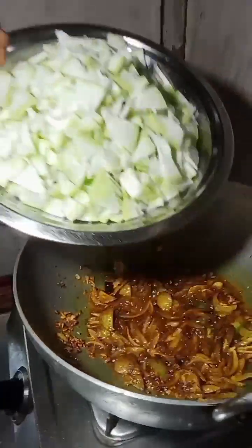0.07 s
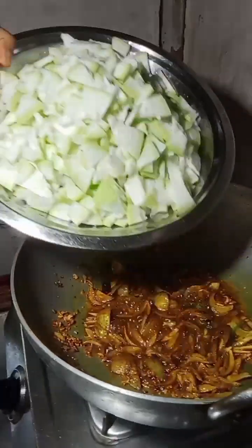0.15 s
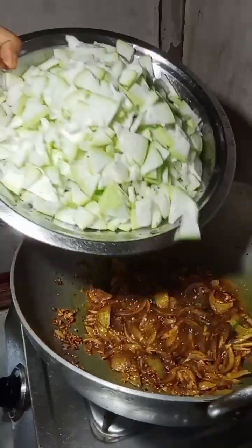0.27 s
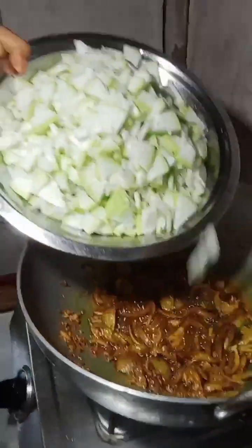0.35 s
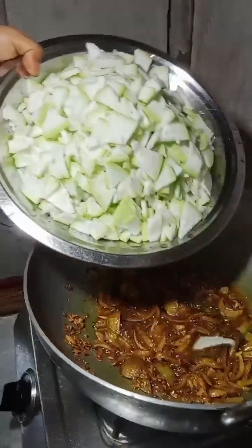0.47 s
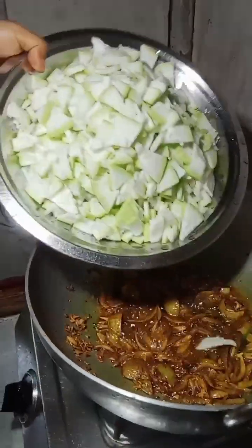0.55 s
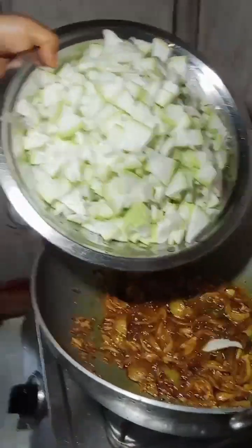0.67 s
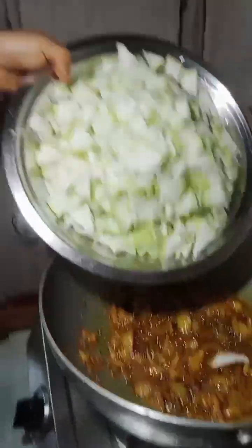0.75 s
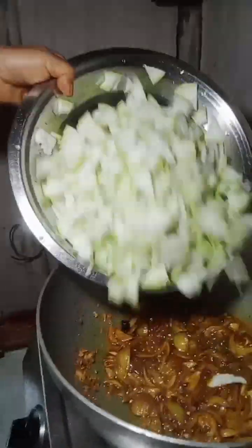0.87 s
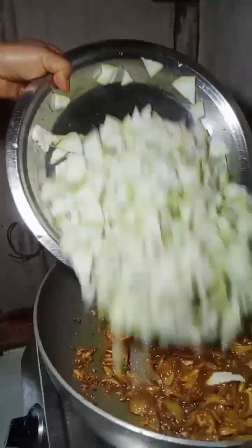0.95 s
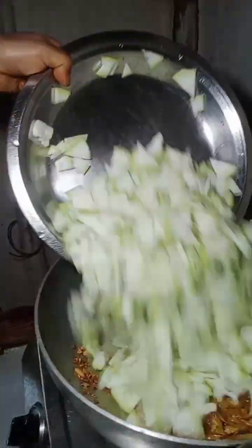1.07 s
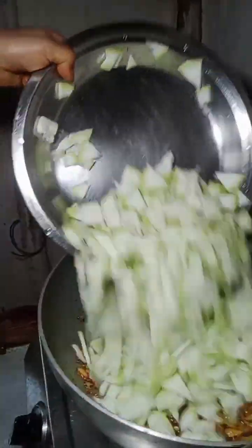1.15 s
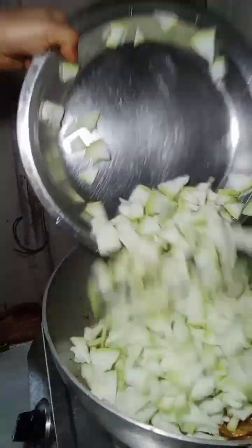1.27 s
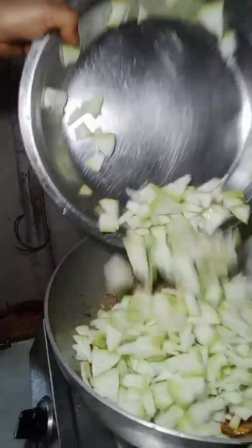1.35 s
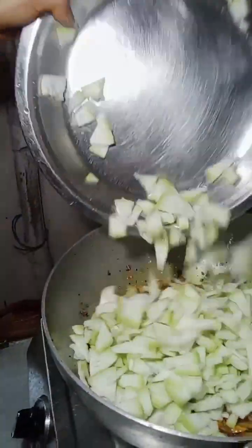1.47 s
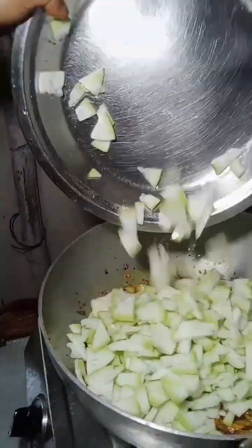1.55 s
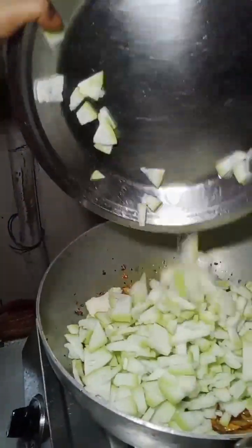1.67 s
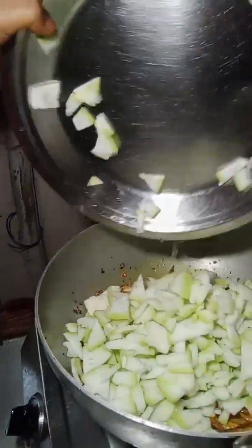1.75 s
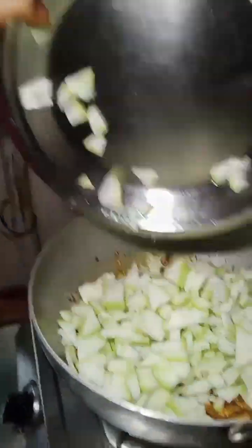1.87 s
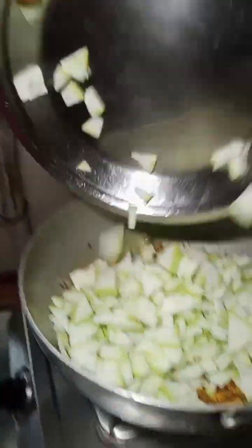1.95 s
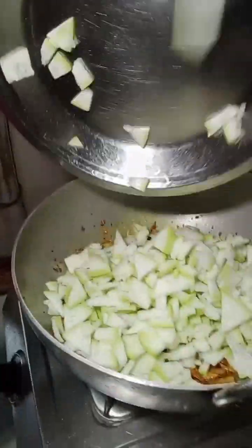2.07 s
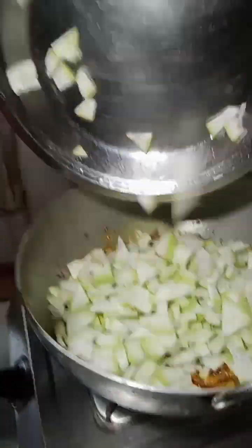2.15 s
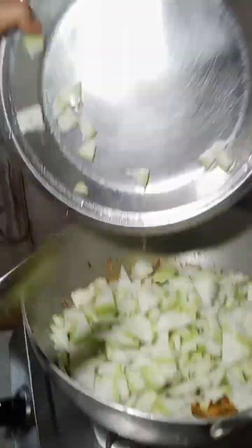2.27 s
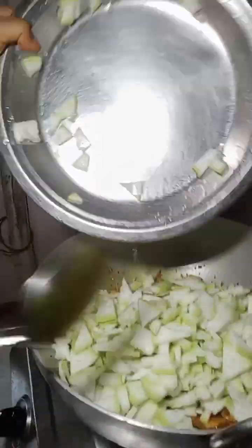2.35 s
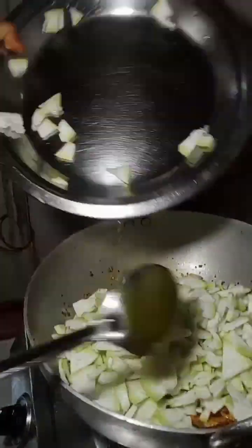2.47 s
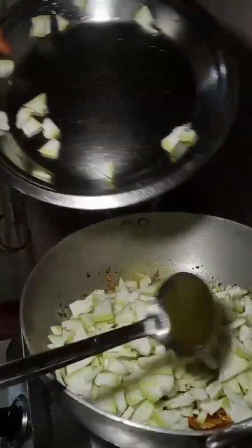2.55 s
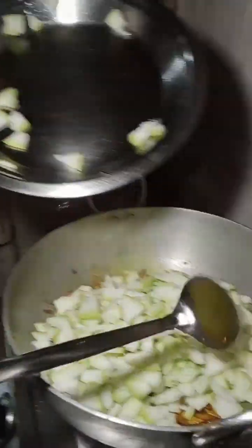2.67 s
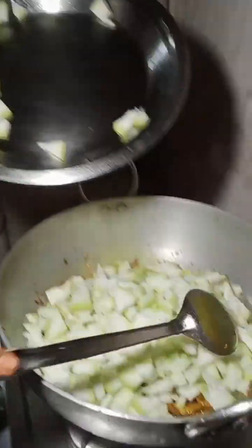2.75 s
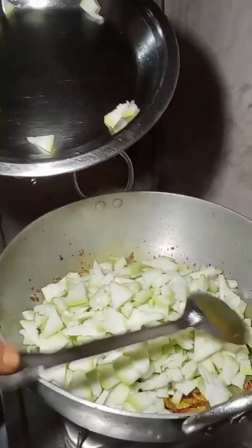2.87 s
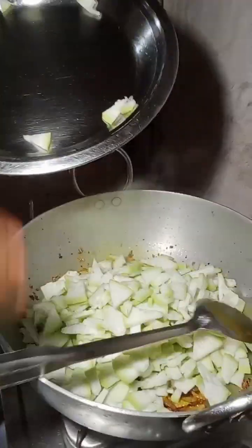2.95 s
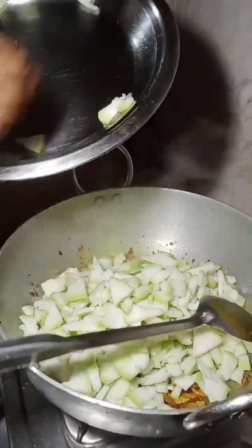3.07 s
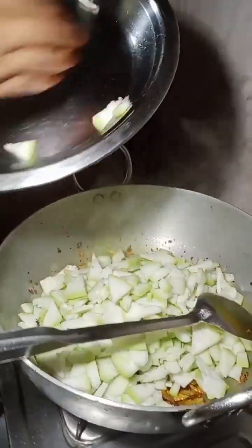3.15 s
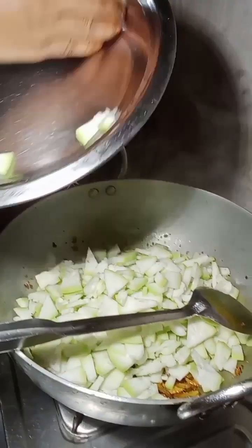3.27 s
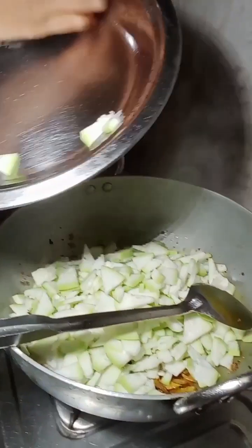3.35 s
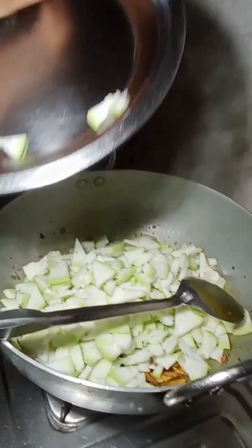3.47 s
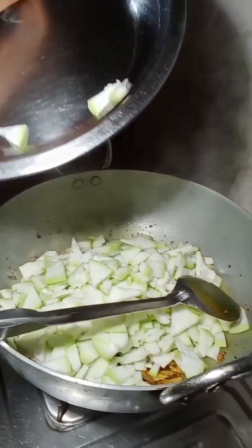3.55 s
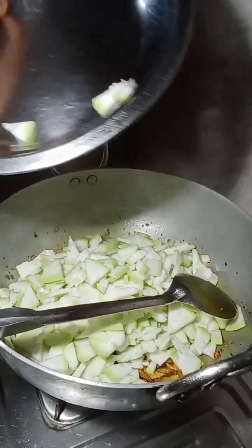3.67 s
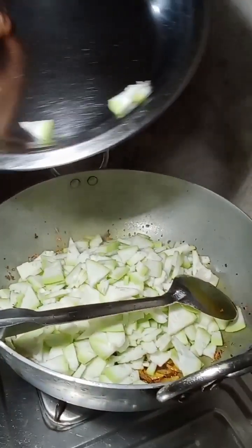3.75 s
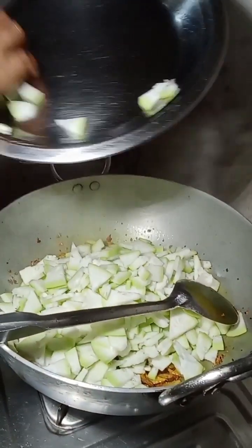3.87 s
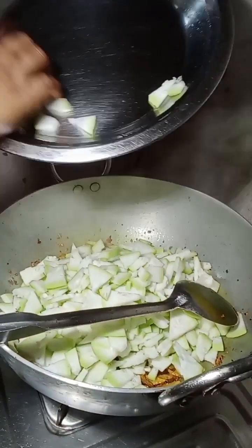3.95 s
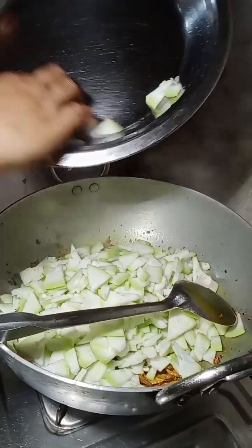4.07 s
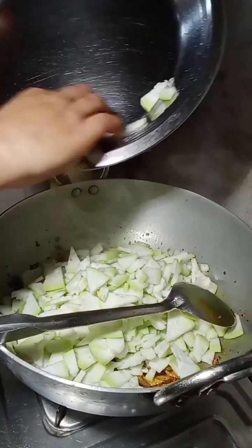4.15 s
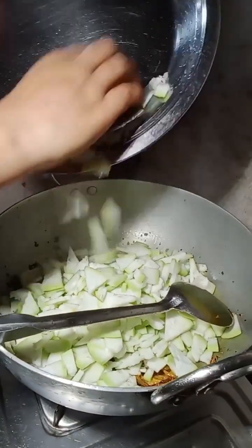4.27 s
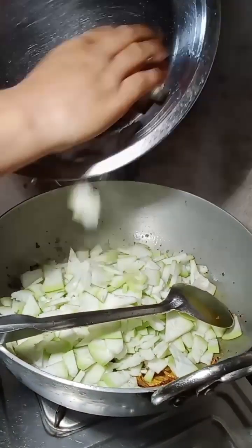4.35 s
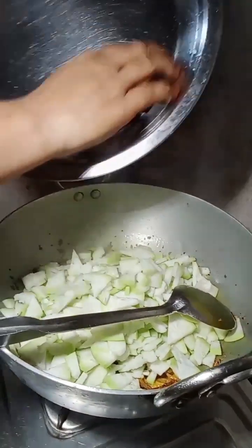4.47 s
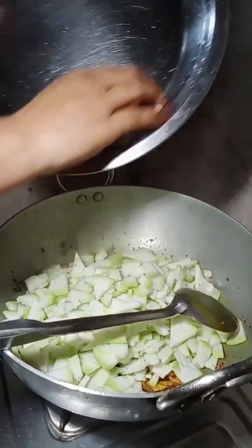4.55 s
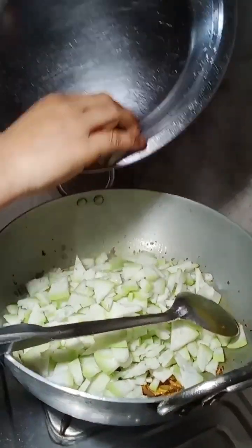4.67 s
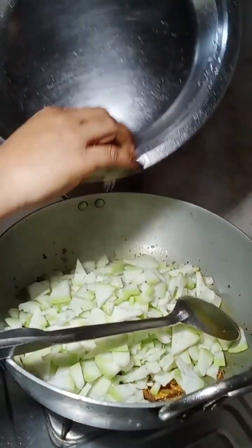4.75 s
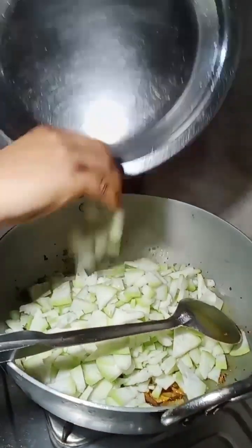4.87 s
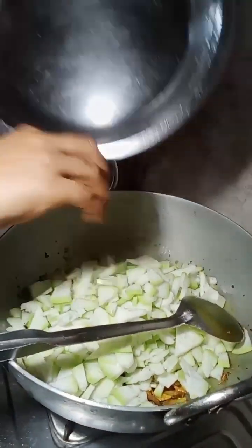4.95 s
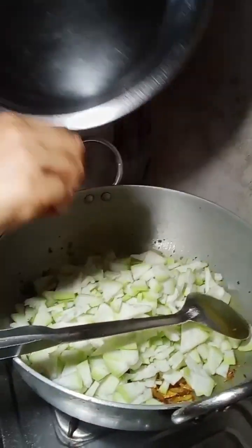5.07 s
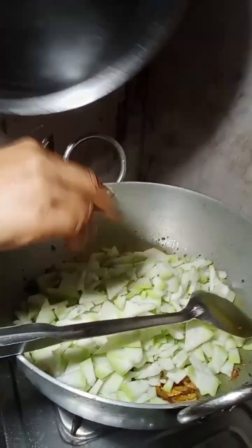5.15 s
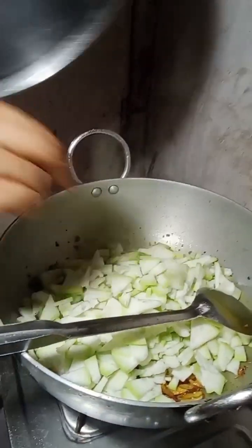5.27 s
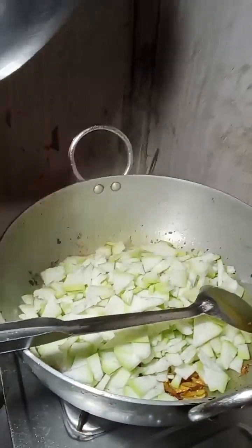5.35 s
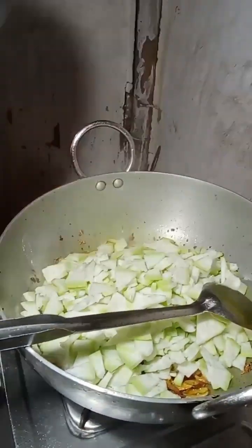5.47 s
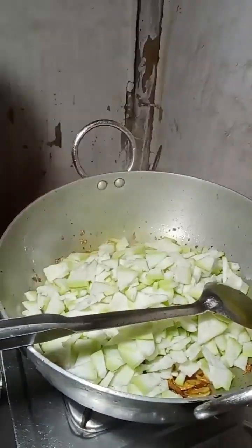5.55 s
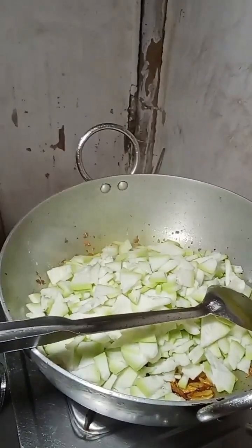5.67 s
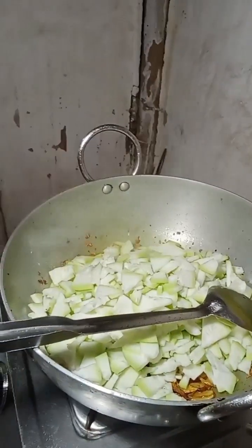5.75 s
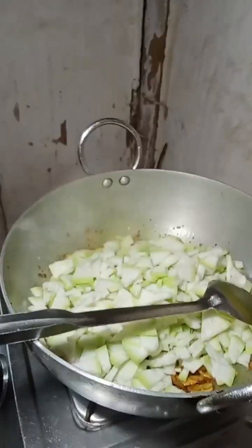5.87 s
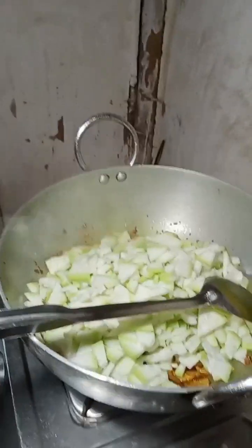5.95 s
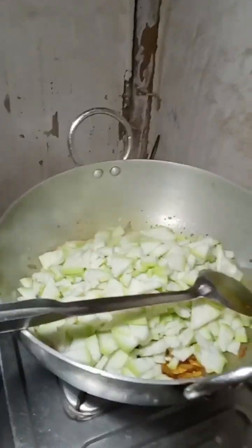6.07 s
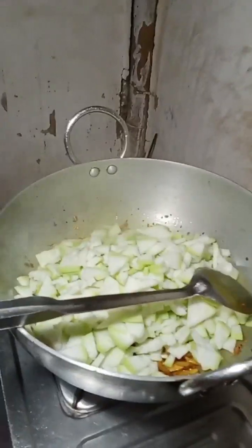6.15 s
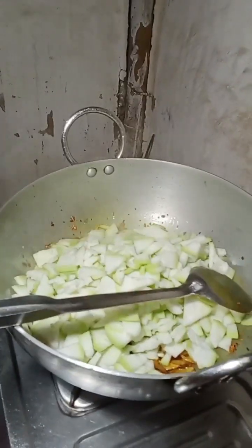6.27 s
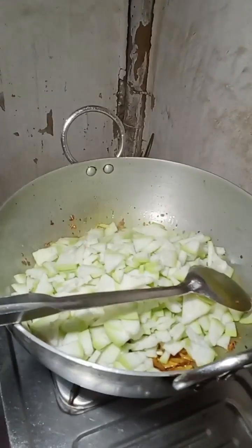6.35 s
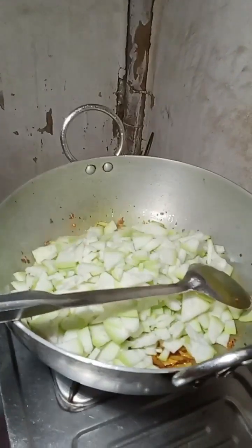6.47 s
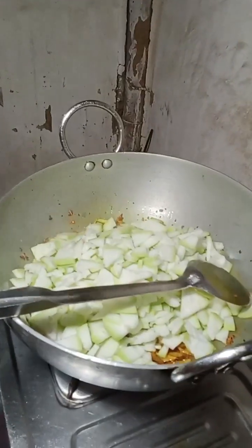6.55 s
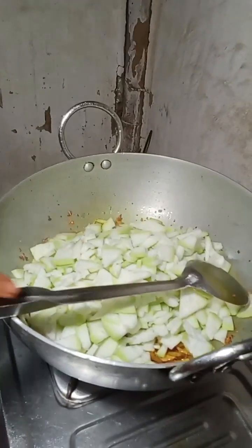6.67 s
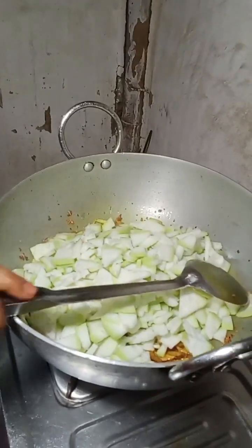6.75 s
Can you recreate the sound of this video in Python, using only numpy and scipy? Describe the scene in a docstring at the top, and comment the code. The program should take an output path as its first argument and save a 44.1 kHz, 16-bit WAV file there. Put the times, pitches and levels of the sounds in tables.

```python
"""Small kitchen, one close microphone: onions fry gently while vegetables shift softly on a steel plate.
The heap slides into the wok and bursts into a loud sizzle, made of random pops and hiss through colour filters.
A ladle scrapes through it as narrow noise, then clanks on the rim as decaying modes; the sizzle settles.
A few last pieces are flicked in, and the plate is set down with a ringing knock, also a set of modes.
A low hum, a sine with a faint octave, climbs slowly behind it all."""
import sys
import numpy as np
from scipy import signal
from scipy.fft import rfft, irfft, next_fast_len
from scipy.io import wavfile

SR = 44100
rng = np.random.default_rng(int(sys.argv[2]) if len(sys.argv) > 2 else 0)


def generate_wav(signal):
    """Clip the signal to [-1, 1] and save it as 16-bit WAV at the path in sys.argv[1]."""
    frames = np.transpose(np.atleast_2d(signal))
    scaled = np.clip(frames, -1, 1) * 32767
    pcm = np.round(scaled).astype(np.int16)
    wavfile.write(sys.argv[1], SR, pcm)


N = 299880
TIME = np.arange(N) / SR

# The ladle lands on the rim and chatters.
# Each row: time in seconds, ladle level in dB, crack level in dB.
CLANKS = [(2.878, -12.5, -21), (2.88, -27, -19.5), (2.8955, -22, -18), (2.902, -15.5, -29),
          (2.905, -21, -27), (2.912, -18.5, -24), (2.955, -21.5, -37), (2.985, -32, -35), (3.132, -37, -27)]
# The heap starts to land, takes a moment to catch, and is all in the wok.
LANDS_AT_S, CATCH_S, ALL_IN_AT_S = 0.958, 0.055, 1.58


def from_db(db):
    """Decibels to gain."""
    return 10 ** (np.asarray(db) / 20)


def rms_one(x):
    """Scale to unit power."""
    return x / np.sqrt(np.mean(x ** 2) + 1e-20)


def drift(rate):
    """Slow chance of spread 1, turning about rate times a second."""
    knots = rng.standard_normal(4000)
    return rms_one(np.interp(TIME * rate, np.arange(len(knots)), knots))


def swell(middle, length):
    """A smooth rise and fall of height 1, in seconds."""
    return np.cos(np.pi * np.clip((TIME - middle) / length, -.5, .5)) ** 2


def colour(x, spectrum):
    """Causal (minimum-phase) filter with the given spectrum; white input keeps its power."""
    size = 2 * next_fast_len(N // 2 + SR // 8)
    hz, db = np.transpose(spectrum)
    bins_hz = np.arange(size // 2 + 1) * SR / size
    gain = rms_one(from_db(np.interp(np.log(bins_hz + 1), np.log(hz), db)))
    # folding the cepstrum onto positive time gives the minimum phase
    cepstrum = irfft(np.log(gain))
    cepstrum[1:size // 2] *= 2
    cepstrum[size // 2 + 1:] = 0
    return irfft(rfft(x, size) * np.exp(rfft(cepstrum)))[:N]


def bells(x, peaks):
    """A chain of resonant peaks and dips."""
    for hz, width_hz, db in peaks:
        g, k = from_db(db / 2), np.pi * width_hz / SR
        c = -2 * np.cos(2 * np.pi * hz / SR)
        x = signal.lfilter([1 + k * g, c, 1 - k * g], [1 + k / g, c, 1 - k / g], x)
    return x


def band(x, low_hz, high_hz):
    """A gentle band-pass."""
    return signal.sosfilt(signal.butter(2, [low_hz, high_hz], "band", fs=SR, output="sos"), x)


def clicks(times, levels_db):
    """One impulse for each contact."""
    out = np.zeros(N)
    out[np.round(np.asarray(times) * SR).astype(int)] = from_db(levels_db)
    return out


def burst(force, t60):
    """Noise that starts with each click and dies away by 60 dB in t60 seconds."""
    fade = from_db(-60 / (t60 * SR))
    return signal.lfilter([1], [1, -fade], force + 1e-18) * rng.standard_normal(N)


def topped_up(force, modes):
    """Each contact adds its energy to modes that are already ringing."""
    out = np.zeros(N)
    for hz, db, t60 in modes:
        fade = from_db(-120 / (t60 * SR))  # energy falls twice as fast in dB as amplitude
        energy = signal.lfilter([1], [1, -fade], force ** 2 + 1e-18)
        out += from_db(db) * np.sqrt(energy) * np.sin(2 * np.pi * (hz * TIME + rng.random()))
    return out


def pops(per_s, spread_db, clump_db, hiss):
    """Steam bubbles burst at random, most small and a few large, in clumps, over the hiss of the tiniest."""
    born = rng.random(N) < per_s / SR
    sizes = from_db(spread_db * np.minimum(rng.exponential(1, N), 5)) * rng.choice([-1, 1], N)
    bursting = rms_one(born * sizes) + hiss * rng.standard_normal(N)
    return rms_one(bursting * from_db(clump_db * drift(70)))


def rubs(strokes, width):
    """Dense little slips, in uneven clumps, excite one resonance for the length of each stroke.

    The width of the resonance is a share of its pitch."""
    slips = pops(per_s=520, spread_db=1.5, clump_db=3.0, hiss=1.0)
    out = np.zeros(N)
    for start, end, db, hz in strokes:
        stroke = np.sin(np.pi * np.clip((TIME - start) / (end - start), 0, 1))
        rubbed = rms_one(band(slips, hz * (1 - width / 2), hz * (1 + width / 2)))
        out += from_db(db) * np.sqrt(np.abs(stroke)) * rubbed
    return out


def rumble():
    """Burner and room: unsteady noise, mostly low."""
    # Each row: frequency in Hz, density in dB per Hz.
    rumble_colour = [(20, -34), (40, -5), (70, -3), (110, 1.5), (170, 0), (280, -5), (520, -3),
                     (1000, -11.5), (4000, -45)]
    return from_db(-57.0 + 3.4 * drift(17)) * colour(rng.standard_normal(N), rumble_colour)


def hum():
    """A low, unsteady tone with a faint octave that climbs slowly, swelling and fading."""
    # Each row: middle in seconds, length in seconds, peak in dB, octave in dB relative to the tone.
    hum_swells = [(0.06, 0.22, -53, -22), (0.24, 0.16, -50, -18), (1.135, 0.5, -49.5, -13),
                  (1.834, 0.45, -44, -24), (2.273, 0.29, -45, -26), (3.97, 0.16, -47, -22),
                  (5.07, 0.36, -42, -12), (5.29, 0.42, -39.5, -7), (5.47, 0.16, -49, -20),
                  (6.29, 0.34, -44.5, -20), (6.59, .22, -44, -19), (6.79, 0.1, -39, -15)]
    # it climbs a little faster all the time
    start_hz, rise_hz_per_s, bend_hz_per_s2 = 172.3, 3.2, 0.53
    steady_db, steady_octave_db = -56.5, -35
    hz = start_hz + rise_hz_per_s * TIME + bend_hz_per_s2 * TIME ** 2
    phase = 2 * np.pi * np.cumsum(hz * (1 + .016 * drift(45))) / SR
    tone, octave = np.sin(phase), np.sin(2 * phase)
    out = from_db(steady_db) * (tone + from_db(steady_octave_db) * octave)
    for middle, length, db, octave_db in hum_swells:
        out += from_db(db) * swell(middle, length) * (tone + from_db(octave_db) * octave)
    return out * from_db(1.8 * drift(30))


def kitchen(x):
    """Dense reflections from near walls, dying quickly."""
    t60_s = 0.24
    t = TIME[:SR // 2]
    tail = rng.standard_normal(len(t)) * from_db(-60 * t / t60_s) * (t > .004)
    return signal.fftconvolve(x, tail / np.linalg.norm(tail))[:N]


def shifting():
    """The heap shifts softly on the plate: wide, low rubs."""
    # Each row: start in seconds, end in seconds, level in dB, pitch in Hz.
    shifts = [(0.0, 0.15, -59, 640), (0.195, 0.31, -58, 900), (0.3, 0.44, -56, 440)]
    return rubs(shifts, width=0.91)


def creaks():
    """The tilting plate gives a few short, pitched creaks just before the heap slides off."""
    # Each row: time in seconds, level in dB.
    creak_times = [(0.797, -49), (0.8165, -36), (0.857, -48)]
    # Modes of the creak. Each row: frequency in Hz, level in dB, t60 in seconds.
    creak_modes = [(1043, 1, 0.06), (1110, -3, .035), (1215, -12, .07), (1870, -11, .04)]
    return band(topped_up(clicks(*np.transpose(creak_times)), creak_modes), low_hz=750, high_hz=2200)


def thud(s, db, hz, t60):
    """A soft contact gives a short, dull burst around one pitch."""
    width_hz = 45 + .28 * hz
    dull = band(burst(clicks([s], [db]), t60), hz - width_hz / 2, hz + width_hz / 2)
    return dull * np.sqrt(SR / 2 / width_hz)  # restores the power lost to the narrow band


def thuds():
    """Soft, dull blows: the plate is bumped about in the hand, pieces land and the ladle settles."""
    # Low bumps of the plate. Each row: time in seconds, level in dB, centre in Hz.
    bumps = [(0.06, -49, 140), (0.19, -48, 155), (0.244, -45, 116), (0.39, -48, 160), (1.2, -47, 109),
             (1.77, -48, 120), (1.87, -46.5, 110), (3.259, -45, 121), (3.39, -46.5, 112), (3.75, -53, 106),
             (3.96, -49, 116), (4.3, -47, 100), (4.6, -45.5, 100), (5.3, -47, 100), (5.69, -52, 90),
             (6.461, -35, 86), (6.52, -38.5, 90.5)]
    # Pieces landing and the ladle settling.
    # Each row: time in seconds, level in dB, centre in Hz, t60 in seconds.
    soft_blows = [(0.2, -52, 720, .2), (0.285, -53, 760, 0.13), (0.41, -57, 560, .3),
                  (0.931, -44, 575, 0.96), (0.988, -30.5, 590, 0.39), (0.989, -52, 412, 0.16),
                  (1.03, -35.5, 473, 0.42), (1.134, -31.5, 560, 0.1), (1.78, -43, 650, 0.32),
                  (2.176, -34.5, 520, .12), (2.439, -27.5, 930, 0.16), (2.485, -31, 600, 0.16),
                  (3.14, -28.5, 930, 0.076), (3.49, -42, 440, 0.15), (3.615, -41.5, 453, 0.072),
                  (3.959, -39, 890, 0.21), (4.6, -41, 700, .2), (5.664, -42, 480, .1)]
    return sum(thud(*row, t60=0.32) for row in bumps) + sum(thud(*row) for row in soft_blows)


def plate():
    """A dull knock on the counter; one mode rings on until the hand stills it."""
    # It touches the counter, lands on both edges and rocks once.
    # Each row: time in seconds, ringing level in dB, thump level in dB.
    set_down = [(6.119, -27, -13), (6.1226, -16.5, 5.5), (6.1256, -21.5, 4.5), (6.1325, -30, -19)]
    # Modes of the plate. Each row: frequency in Hz, level in dB, t60 in seconds.
    plate_modes = [(82, -15, .28), (113, -14, .33), (190, -8, .09), (247, -8.5, .32), (312, -6, .17),
                   (377, 3.5, .04), (407, 1.5, .05), (436, -11, .42), (522, -15, .28), (581, -14, .33),
                   (662, -6, .13), (764, -3, .06), (800, 1, .05), (993, 5, .08), (1147, -4, .82),
                   (1367, -8, .12), (1500, -17, .07), (1835, -23, .5)]
    # Contact noise. Each row: frequency in Hz, density in dB per Hz.
    plate_crack = [(40, -20), (90, -7), (370, 13.5), (580, -2), (900, 5), (1200, -2), (1380, 4), (1560, 0),
                   (1780, -3), (2300, -37), (6000, -54)]
    stilled_at_s, stilled_db_per_s = 6.33, 110
    s, db, thump_db = np.transpose(set_down)
    # the contact is soft, so the blow holds little treble
    body = band(topped_up(clicks(s, db), plate_modes), low_hz=50, high_hz=1990)
    stilled = from_db(-stilled_db_per_s * np.maximum(TIME - stilled_at_s, 0))
    thump = clicks(s, thump_db)
    rattle = from_db(-28) * burst(thump, t60=0.17)
    return body * stilled + colour(thump + rattle, plate_crack)


def rim():
    """The chatter pumps up each mode of the rim, which dies away and is rung once more as the ladle settles."""
    # Each row: frequency in Hz, level in dB, build-up in seconds, t60 in seconds.
    rim_modes = [(732, -35, .08, .35), (2013, -29, .03, .3), (2315, -27, .02, .42), (2412, -23, .07, .45),
                 (2621, -26, .033, .36), (3517, -22.5, .078, .42), (5502, -34, .1, .25),
                 (5652, -25.5, .095, .22), (5730, -35, .06, .2), (5922, -33.5, .04, .35),
                 (6142, -35, .04, .25), (6804, -40, .09, .3)]
    out, since = np.zeros(N), np.maximum(TIME - CLANKS[0][0], 0)
    for hz, db, build_s, t60 in rim_modes:
        build_up = np.minimum(since / build_s, 1)
        fade_db = -60 * np.clip((since - build_s) / t60, 0, 3)
        out += build_up * from_db(db + fade_db) * np.sin(2 * np.pi * hz * since)
    last_touch = clicks([CLANKS[-1][0]], [-14])
    settling = topped_up(last_touch, [(hz, db, t60) for hz, db, _, t60 in rim_modes])
    return (out + settling) * from_db(2.2 * drift(150))


def ladle():
    """Each touch rings the ladle with a gritty crack, and the wok's rim answers."""
    # Modes of the ladle. Each row: frequency in Hz, level in dB, t60 in seconds.
    ladle_modes = [(560, -5, .045), (1690, -3, .04), (1825, -16, .12), (2395, -3, .04), (2530, -13, .1),
                   (2745, -12, .09), (2875, -9.5, .11), (2935, -3, .045), (3068, -12, .17),
                   (3965, -1, .125), (3992, -13, .12), (4138, -3.5, .14), (4211, -14, .1), (4296, -13, .22),
                   (4931, -13, .08), (4995, -13, .07)]
    # Contact noise. Each row: frequency in Hz, density in dB per Hz.
    clank_crack = [(100, -42), (280, -16), (500, 0), (1000, -8), (1700, 0), (3000, -5), (5000, -6),
                   (7000, -17), (12000, -51)]
    s, ladle_db, crack_db = np.transpose(CLANKS)
    crack = colour(burst(clicks(s, crack_db), t60=0.04), clank_crack)
    # small parts radiate no bass, and the oily contact dulls the top
    ringing = band(topped_up(clicks(s, ladle_db), ladle_modes), low_hz=350, high_hz=7500)
    return ringing + rim() + crack


def scraping():
    """The ladle scrapes through the heap: rubs of medium width."""
    # Each row: start in seconds, end in seconds, level in dB, pitch in Hz.
    scrapes = [(2.39, 2.465, -27, 1900), (2.435, 2.48, -27, 1430), (2.465, 2.58, -29.5, 2830),
               (2.52, 2.63, -27, 2000), (2.53, 2.645, -29, 1470), (2.7, 2.77, -27.5, 1810),
               (2.745, 2.8, -26.5, 1450), (2.836, 2.865, -26.5, 1540)]
    return rubs(scrapes, width=0.2)


def skidding():
    """The last pieces are flicked in and skid over the hot metal."""
    # Each row: start in seconds, end in seconds, level in dB, pitch in Hz.
    skids = [(5.325, 5.37, -34, 3760), (5.37, 5.42, -37, 1900), (5.452, 5.48, -34, 2280),
             (5.48, 5.505, -31, 4130), (5.49, 5.53, -34, 2730)]
    return rubs(skids, width=0.33)


def thin_tones():
    """Thin, short pitched sounds: bubble pings in the gentle frying, then squeaks and whistles.

    All are noise in a very narrow band."""
    # Each row: start in seconds, end in seconds, level in dB, pitch in Hz.
    thin_strokes = [(0.01, 0.05, -58, 1820), (0.14, 0.2, -64, 1650), (0.23, 0.275, -58.5, 1250),
                    (0.27, 0.335, -59, 1460), (0.31, 0.37, -55, 441), (0.395, 0.45, -56, 1830),
                    (0.655, 0.69, -52, 7430), (1.31, 1.4, -28, 3010), (5.32, 5.524, -37, 9240),
                    (5.43, 5.53, -32, 2400), (5.45, 5.472, -35, 9350), (5.45, 5.5, -36, 4870),
                    (5.36, 5.53, -42.5, 6720), (6.437, 6.598, -38.5, 2780), (6.45, 6.53, -37, 1416),
                    (6.744, 6.796, -37, 1386)]
    return rubs(thin_strokes, width=0.032)


def tumbling():
    """Pieces poured, stirred or flicked in tap the wok, each with its own strength and one of 14 pitches."""
    # Each row: middle in seconds, length in seconds, level in dB.
    tumbles = [(1.3, 0.72, -36), (1.9, 0.81, -46), (2.542, 0.99, -31.5), (5.427, 0.19, -52.5)]
    taps_per_s, tap_cycles = 110, 40  # a tap dies by 60 dB within this many cycles
    strength = sum(from_db(db) * np.sqrt(swell(middle, length)) for middle, length, db in tumbles)
    sizes = from_db(4 * np.minimum(rng.exponential(1, N), 3))
    taps = (rng.random(N) < taps_per_s / SR) * sizes * strength
    pitches_hz = np.geomspace(560, 4227, 14)
    dealt = rng.integers(0, len(pitches_hz), N)
    knocks = sum(topped_up(taps * (dealt == k), [(hz, 0, tap_cycles / hz)])
                 for k, hz in enumerate(pitches_hz))
    return band(knocks, low_hz=440, high_hz=6000)


def flares(per_s, t60):
    """Drops meet the oil at random: each flares up at once and fizzes out. Mean 1."""
    starts = (rng.random(N) < per_s / SR) * rng.exponential(1, N)
    flaring = signal.lfilter([1], [1, -from_db(-60 / (t60 * SR))], starts + 1e-18)
    return flaring / flaring.mean()


def pitched_grain():
    """Many brief, faint tones at random pitches give the crackle and droplets a finely pitched grain."""
    per_s, length_s, level_db = 260, 0.03, -11  # level relative to the crackle or the droplets
    low_hz, high_hz = 2204, 11930
    out, t = np.zeros(N + SR), TIME[:int(length_s * SR)]
    window = np.hanning(len(t))
    for when, pitch, size in rng.random((int(per_s * N / SR), 3)):
        start, hz = int(when * N), low_hz + pitch * (high_hz - low_hz)
        out[start:start + len(t)] += size * window * np.sin(2 * np.pi * hz * t)
    return from_db(level_db) * rms_one(out[:N])


def course(before_db, landing_db, full_db, cooling_db_per_s):
    """Level in dB: a jump as the heap lands, a build-up while it pours, then a steady fall as the oil cools."""
    turns_s = [LANDS_AT_S, LANDS_AT_S + CATCH_S, ALL_IN_AT_S]
    level_db = np.interp(TIME, turns_s, [before_db, landing_db, full_db])
    return level_db - cooling_db_per_s * np.maximum(TIME - ALL_IN_AT_S, 0)


def surging():
    """Fresh wet faces meet the hot metal and the frying surges, or it lulls: extra dB for its three parts."""
    # Each row: middle in seconds, length in seconds, extra bubbling, sizzle and spray in dB.
    surges = [(0.675, 0.39, -3, -1.5, 1.5), (0.816, 0.49, 0.5, 3.5, 5.5), (1.367, 0.28, 0.5, 2, 3),
              (1.623, 0.16, -1, 2.5, 0.5), (1.78, 0.17, -5.5, 1, -5), (1.893, 0.099, -1.5, 2.5, 2.5),
              (2.288, 0.35, 6.5, 1, 4.5), (2.506, 0.41, 8.5, 2, 4.5), (2.717, 0.35, 7, 1.5, -0.5),
              (2.98, 0.42, 7.5, -1, -2), (3.247, 0.21, -1.5, 3.5, -2), (3.673, 0.13, -0.5, 0.5, 3.5),
              (3.878, 0.37, 0, -0.5, -4), (4.083, 0.22, 0.5, -1.5, 1.5), (5.224, 0.37, -3, -1.5, -1),
              (5.337, 0.25, 4, 1.5, 6), (5.471, 0.11, 4.5, -1.5, 2), (5.67, 0.8, 1, 1.5, 4.5),
              (6.684, 0.073, -1, -3, 6.5)]
    return sum(np.outer(extra_db, swell(middle, length)) for middle, length, *extra_db in surges)


def bubbling(extra_db):
    """Big wet bubbles burst low in the wok."""
    # Each row: frequency in Hz, density in dB per Hz.
    bubbling_colour = [(200, -17.5), (320, -31), (410, -1), (520, 1.5), (700, -1), (950, 2), (1400, 1),
                       (2000, 2), (3200, -19), (6000, -54)]
    # Level before the heap lands, on landing and when all is in, in dB, then dB lost per second.
    bubbling_course = (-60, -42, -36, 1.73)
    flaring = rms_one(1 + 0.043 * flares(per_s=50, t60=0.25))
    bubbles = pops(per_s=1500, spread_db=3.0, clump_db=1.07, hiss=0.84) * flaring
    level_db = course(*bubbling_course) + extra_db + 0.14 * drift(3.0)
    return colour(bubbles * from_db(level_db), bubbling_colour)


def sizzling(level_db, snaps):
    """The main sizzle: dense crackle, larger snaps and a pitched grain, roughened in quick, uneven bursts."""
    # Each row: frequency in Hz, density in dB per Hz.
    sizzle_colour = [(400, -48.5), (900, -16.5), (1250, -9), (1800, 3), (2300, -0.5), (2900, 1.5),
                     (3800, -3.5), (5200, -5), (6300, -20), (8000, -19), (12000, -46)]
    flaring = rms_one(1 + .09 * flares(per_s=70, t60=.03))
    crackle = flaring * pops(per_s=7000, spread_db=2.0, clump_db=-0.3, hiss=0.88)
    mixed = rms_one(crackle + 0.31 * snaps + pitched_grain())
    return colour(mixed * from_db(level_db - 0.13 * drift(140)), sizzle_colour)


def spraying(extra_db, snaps):
    """Fine droplets hiss high up; the larger snaps throw spray too."""
    # Each row: frequency in Hz, density in dB per Hz.
    spray_colour = [(2000, -25), (3500, 2), (6000, -0.5), (7600, -4.5), (8600, 4), (9350, 3), (9750, -8.5),
                    (10700, -14.5), (11450, -6.5), (12000, -21), (12900, -24), (13550, -11.5), (14500, -32),
                    (15600, -21.5)]
    # Level before the heap lands, on landing and when all is in, in dB, then dB lost per second.
    spray_course = (-65, -34.5, -34.5, 1.83)
    flaring = rms_one(1 + 0.29 * flares(per_s=61, t60=0.38))
    droplets = pops(per_s=9000, spread_db=3.0, clump_db=0.0, hiss=1.0) * flaring
    mixed = rms_one(droplets + 0.08 * snaps + pitched_grain())
    return colour(mixed * from_db(course(*spray_course) + extra_db + 0.24 * drift(16)), spray_colour)


def pouring():
    """A bright hiss builds while the heap pours in and fades fast once it is all in."""
    # Each row: frequency in Hz, density in dB per Hz.
    pour_hiss = [(1200, -33), (2400, -0.5), (3200, 4.5), (4300, 0), (5600, -2), (7500, -5), (9200, -9),
                 (10200, -15), (11000, -16), (14000, -35)]
    # Level before the heap lands, on landing and when all is in, in dB, then dB lost per second.
    pour_course = (-93, -32.5, -26, 42)
    hissing = pops(per_s=2700, spread_db=1.0, clump_db=2.0, hiss=0.76)
    return colour(hissing * from_db(course(*pour_course)), pour_hiss)


def spitting(sizzle_db):
    """A spit is a sharp crack followed by a short fizz; the small ones follow the sizzle's strength."""
    # The loudest spits of oil. Each row: time in seconds, level in dB before the colour and gains below.
    spits = [(1.178, -12), (1.3125, -8), (1.3685, -4), (1.515, -5), (1.549, -6), (1.594, -7), (1.75, -10),
             (2.01, -10), (2.1256, -7), (2.179, -9), (2.273, -5.5), (2.437, -7), (2.6165, -4), (2.775, -8),
             (2.839, -8), (3.506, -10), (5.328, -11), (5.34, -10), (5.393, -12), (5.459, -9), (5.621, -11),
             (5.684, -12), (6.711, -14)]
    # Each row: frequency in Hz, density in dB per Hz.
    spit_colour = [(200, -39), (500, -15), (1500, 2.5), (3200, 2.5), (6000, -26), (9200, -5.5),
                   (12000, -33), (15000, -32)]
    small_per_s, small_above_sizzle_db = 12, 8.5
    born = rng.random(N) < small_per_s / SR
    cracks = clicks(*np.transpose(spits)) + born * from_db(sizzle_db + small_above_sizzle_db)
    fizz = burst(cracks, t60=.025)
    return colour(from_db(3.5) * cracks + from_db(-19) * fizz, spit_colour)


def under_plate(open_wok):
    """The upturned plate covers part of the wok, and the space between them resonates."""
    # Each row: time in seconds, share of the wok covered from 0 to 1.
    cover_times = [(0, 0.1), (1.45, 0), (1.75, 0.76), (2.25, 0.57), (2.55, 0), (2.85, 0.26), (3.1, 0),
                   (6.8, 0.09)]
    # The space between them. Each row: centre in Hz, width in Hz, peak or dip in dB.
    space_peaks = [(657, 530, 8), (930, 220, -17), (1522, 68, 8), (1695, 140, -14), (2130, 92, -12),
                   (2200, 150, -0.5), (2794, 88, 11), (2940, 280, -6.5)]
    cover = np.interp(TIME, *np.transpose(cover_times))
    return (1 - cover) * open_wok + cover * bells(open_wok, space_peaks)


def frying():
    """Water flashes to steam in the oil: bubbles, sizzle, spray and spits, all inside the hollow wok."""
    # Hollow of the wok. Each row: centre in Hz, width in Hz, peak or dip in dB.
    hollow = [(702, 92, 7.5), (826, 20, -13), (918, 79, 5.5), (1166, 396, -7), (1368, 220, 9.5),
              (1715, 260, -2.5), (1815, 42, 5), (2150, 74, 1), (2320, 43, 3), (2820, 120, 2),
              (9210, 155, 5.5)]
    # Level before the heap lands, on landing and when all is in, in dB, then dB lost per second.
    sizzle_course = (-60, -37, -26.5, 1.43)
    extra_bubbling_db, extra_sizzle_db, extra_spray_db = surging()
    sizzle_db = course(*sizzle_course) + extra_sizzle_db
    snaps = pops(per_s=97, spread_db=1.5, clump_db=-4, hiss=0)
    boiling = bubbling(extra_bubbling_db) + sizzling(sizzle_db, snaps) + spraying(extra_spray_db, snaps)
    return under_plate(bells(boiling + pouring() + spitting(sizzle_db), hollow))


def scene():
    """Wok, utensils and background, the same in both channels."""
    background = rumble() + hum()
    knocks = shifting() + creaks() + thuds() + plate() + ladle()
    wok = scraping() + skidding() + thin_tones() + tumbling() + frying()
    room = kitchen(from_db(-10.5) * wok + from_db(-14) * knocks)
    return np.tile(wok + knocks + room + background, (2, 1))


def record(dry):
    """The microphone drops the deepest bass, the highest peaks are rounded and the top is cut."""
    thinned = signal.sosfilt(signal.butter(2, 50, "high", fs=SR, output="sos"), dry)
    rounded = 0.87 * np.tanh(thinned / 0.94)
    cutoff_hz = 15650
    return signal.sosfilt(signal.ellip(12, .1, 90, cutoff_hz, fs=SR, output="sos"), rounded)


dry = scene()
out = record(dry)
generate_wav(out)
```